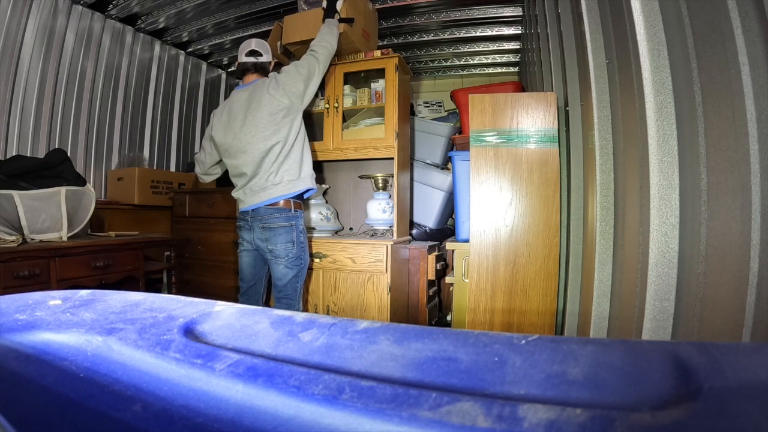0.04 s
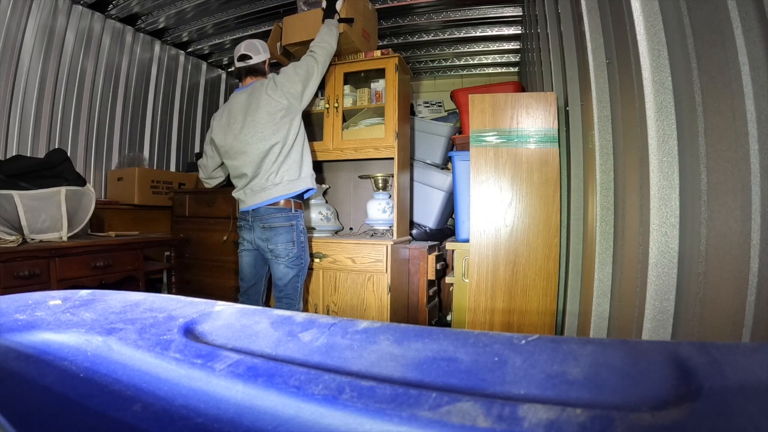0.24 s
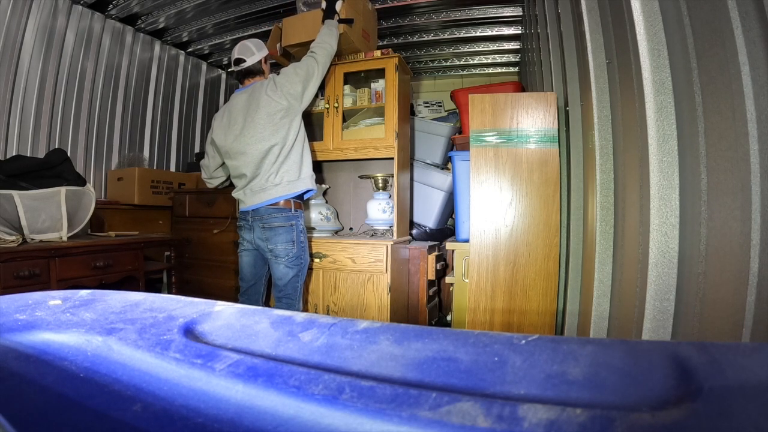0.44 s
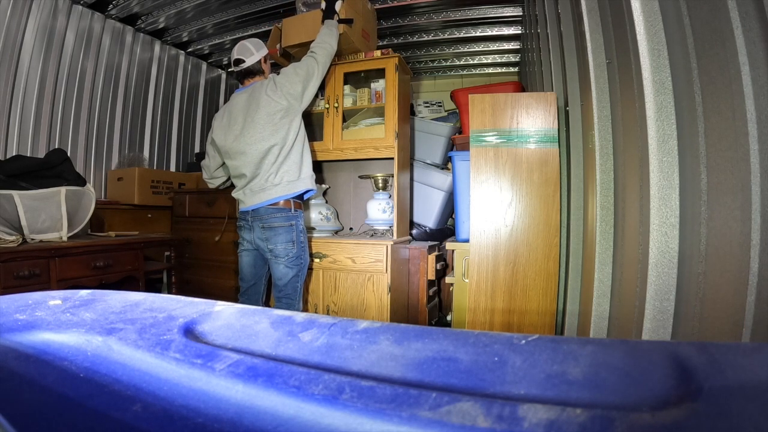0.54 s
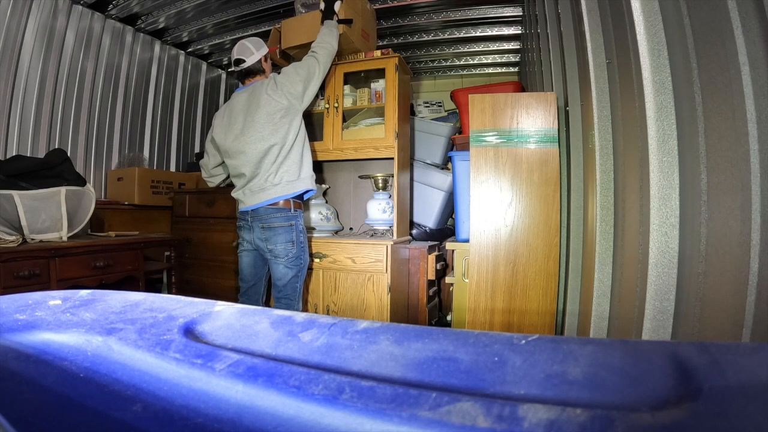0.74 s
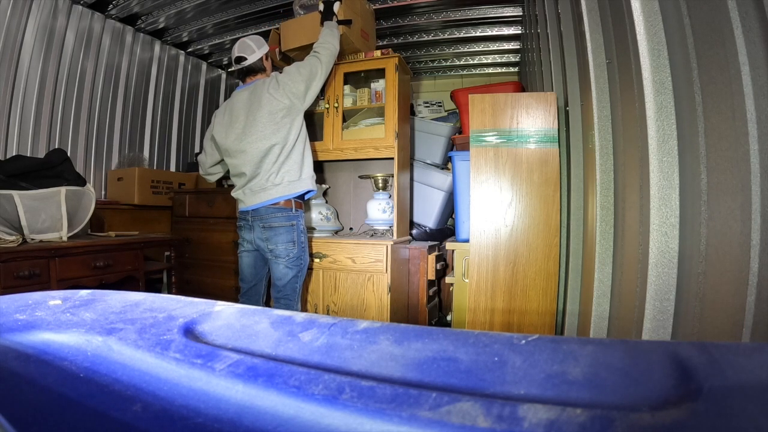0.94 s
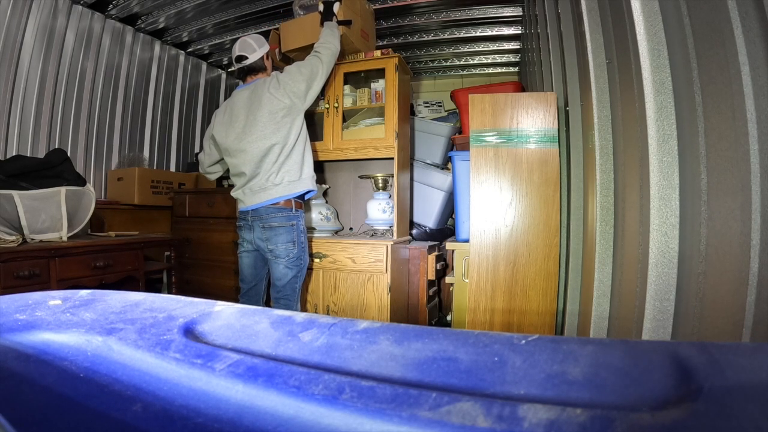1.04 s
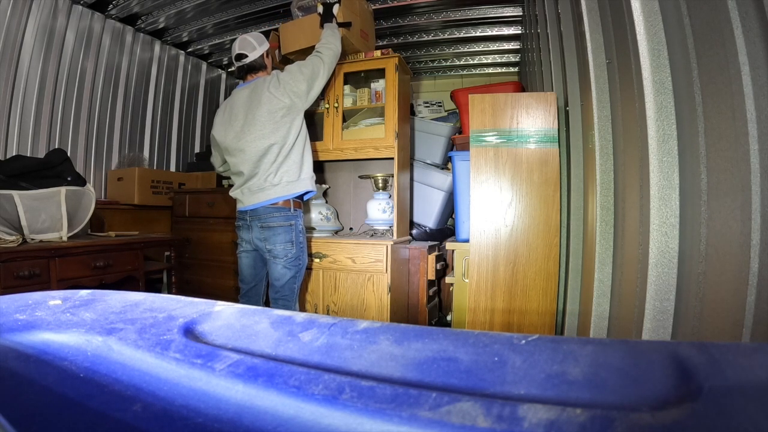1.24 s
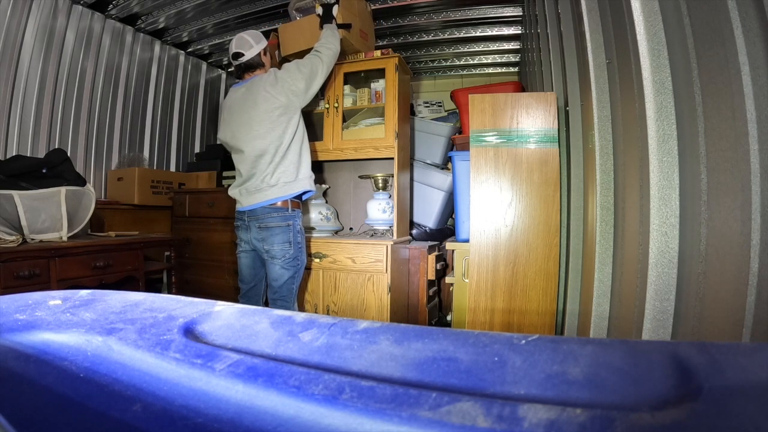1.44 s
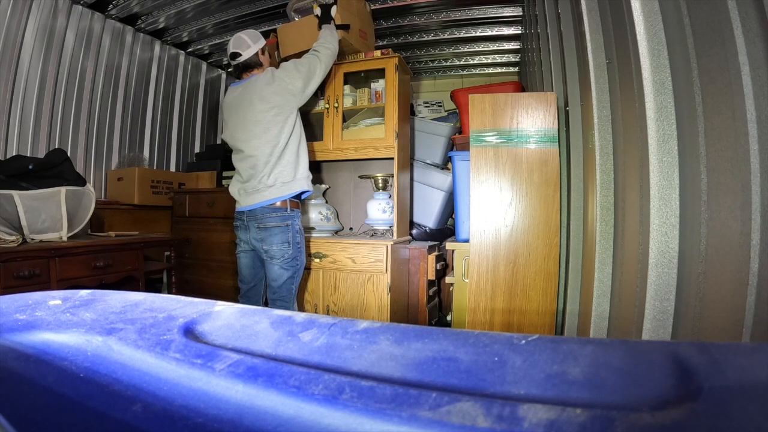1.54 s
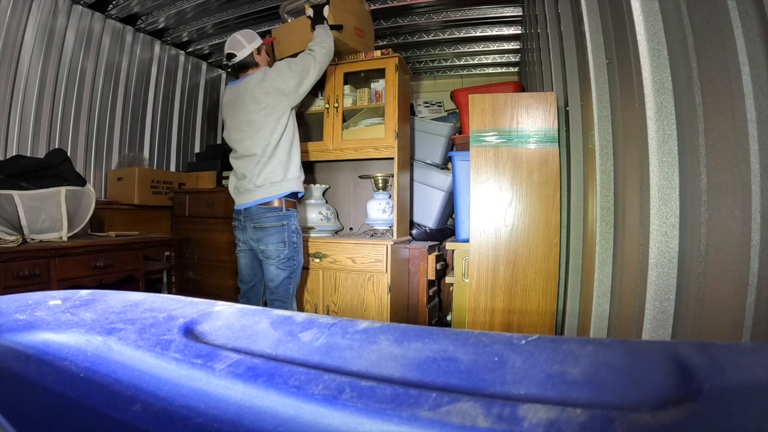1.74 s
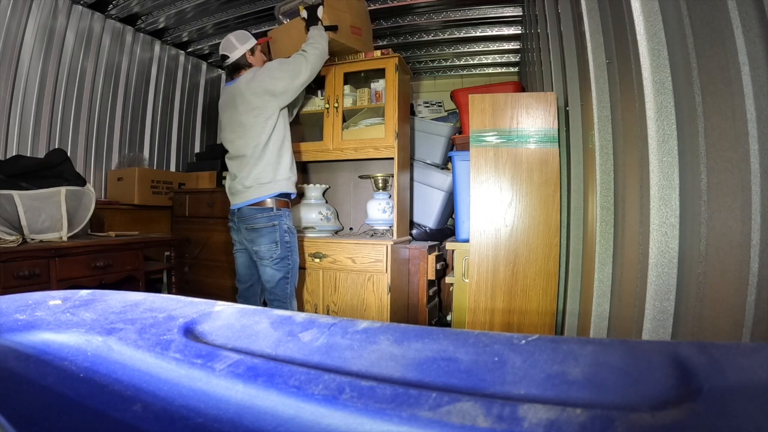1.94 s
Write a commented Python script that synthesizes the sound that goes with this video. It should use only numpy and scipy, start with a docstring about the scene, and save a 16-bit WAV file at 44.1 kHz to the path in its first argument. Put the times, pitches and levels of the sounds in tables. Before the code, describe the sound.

A cardboard box knocks heavily on a wooden cabinet three times in quick succession, booming in a small steel-walled storage unit. It then scuffs and slides faintly over the wood, ending in a short groan and a sleeve rustle.

```python
"""A cardboard box knocks down heavily three times as it is worked off the top of a wooden cabinet.
Each knock makes box and cabinet ring; the small storage unit booms and its sheet-steel walls hum on.
The box also scuffs and slides over the wood, and at the end it groans as it sticks and slips on the edge.
A sleeve rustles as the arms reach up, over faint room noise."""
import sys
import numpy as np
from scipy import signal
from scipy.fft import rfft, irfft, next_fast_len
from scipy.io import wavfile
from scipy.ndimage import map_coordinates

SR = 44100
rng = np.random.default_rng(int(sys.argv[2]) if len(sys.argv) > 2 else 0)


def pcm_store(signal):
    """Save signal as 16-bit PCM."""
    levels = np.round(np.clip(np.atleast_2d(signal), -1, 1) * 32767)
    wavfile.write(sys.argv[1], SR, levels.astype(np.int16).T)


N = 88200  # 2 seconds


def knocks():
    """Each blow tocks, slaps, pops a panel, rings box and cabinet, booms and shakes the walls."""
    # Each row: start in seconds; slap, ring, boom, panel and wall levels in dB; the pitch the blow
    # favours in Hz and its lift in dB; hollow pitch in Hz; tock level in dB; the slap's treble change
    # in dB, its length in seconds and its rise in seconds.
    blows = [(0.232, -17.5, -25, -14, -10, -35, 188, 10, 1340, -20.5, 3.5, 0.064, 0.0045),
             (0.498, -22.5, -28, -16.5, -23.5, -44.5, 402, 15, 367, -13, 1.5, .028, 0.0089),
             (0.738, -20, -17, -16, -17.5, -32.5, 142, 0.5, 960, -21, -1, 0.059, 0.011)]
    # Ringing tones of box and cabinet. Each row: pitch in Hz, relative level in dB, fade in seconds.
    box_tones = [(131, -7.5, 0.26), (153.9, 8.5, 0.23), (179, -5.5, 0.43), (259.7, -3, 0.29),
                 (276.2, 4, 0.22), (417.2, 5.5, 0.23), (492.5, -4.5, 0.15), (532.6, -3, 0.3),
                 (634, 7, 0.14), (767, -12, 0.44), (757, -19.5, 0.15), (958, 3.5, 0.22), (1054, -4, 0.19),
                 (1420, -5, 0.12)]
    # Low tones of the air in the room.
    # Each row: pitch in Hz, relative level in dB, fade in seconds, build-up in seconds.
    air_tones = [(74.5, 13, 0.26, 0.042), (66, -15, 1, 0.09)]
    # Tone colours of the slap and of the steel walls. Each row: frequency in Hz, level in dB.
    slap_colour = [(25, -27), (55, 2), (100, 1), (160, 3), (290, 3), (350, -1), (600, -3.5), (1000, -3.5),
                   (1500, -10.5), (2800, -17.5), (4300, -25.5), (5200, -32), (7000, -34.5), (8500, -46.5),
                   (12800, -53), (15500, -66)]
    wall_colour = [(30, -19), (70, 4.5), (105, -32), (150, 10.5), (210, -8.5), (450, -2.5), (620, -11.5),
                   (900, -6.5), (1400, -20.5), (3000, -30.5), (6000, -42.5), (15000, -55)]
    hollow_lift_db, panel_lift_db = 3, 7.5
    out = np.zeros(N)
    for (start, slap_db, ring_db, boom_db, panel_db, walls_db, favoured_hz, lift_db,
         hollow_hz, tock_db, treble_db, length_s, rise_s) in blows:
        t = since(start)
        hollow_band = lambda hz: near(hz, hollow_hz, octaves=0.35)
        tock = unit(filtered(rng.standard_normal(N), hollow_band))
        out += amp(tock_db) * tock * envelope(t, rise_s=0.003, fade_s=0.06)
        slap = filtered(noise(slap_colour), lambda hz: amp(hollow_lift_db * hollow_band(hz)))
        out += amp(slap_db) * contact(start, slap, treble_db, length_s, rise_s)
        panel = ring(t, hz=264.8, fade_s=0.16, rise_s=0.018)
        out += amp(panel_db + panel_lift_db) * panel
        for hz, db, fade_s in box_tones:
            # Where the blow lands decides which tones ring most.
            favour_db = lift_db * near(hz, favoured_hz, octaves=0.59)
            tone = ring(t, hz, fade_s, rise_s=0.022, drift_radians=0.37 * wobble(60))
            out += amp(ring_db + db + favour_db) * tone
        for hz, db, fade_s, build_s in air_tones:
            out += amp(boom_db + db) * ring(t, hz, fade_s, build_s)
        out += amp(walls_db) * noise(wall_colour) * envelope(t, rise_s=0.01, fade_s=1.27)
    return out


def ring(t, hz, fade_s, rise_s, drift_radians=0):
    """One ringing tone that builds up and dies away; drift makes it waver."""
    return np.sin(2 * np.pi * hz * t + drift_radians) * envelope(t, rise_s, fade_s)


def contact(start, crush, treble_db, length_s, rise_s):
    """Cardboard crushes for a moment; the room's echoes then die, each frequency at its own speed."""
    # The room's echo. Each row: frequency in Hz, seconds to fade by 60 dB.
    room_fade = [(60, .4), (300, 0.32), (1000, 0.3), (2500, 0.36), (7000, 0.28), (13000, 0.15)]
    treble_hz = 1720
    crush = filtered(crush, lambda hz: amp(treble_db * hz ** 2 / (hz ** 2 + treble_hz ** 2)))
    hz, t, bands = signal.stft(crush, SR, nperseg=256)
    after_contact_s = np.maximum(t - start - length_s, 0)
    fade = amp(-60 * after_contact_s / along(room_fade, hz)[:, None])
    return signal.istft(bands * fade, SR)[1][:N] * rise(since(start), rise_s)


def scuffs():
    """The box catches briefly on the cabinet, each time a rasp of its own pitch over a soft thud."""
    # Each row: start in seconds, rasp level in dB, treble change in dB, length in seconds,
    # thud level in dB, rasp pitch in Hz.
    catches = [(0.38, -26.5, -2, 0.022, -32, 2050), (0.982, -53.5, -2.5, 0.016, -40, 1620),
               (1.096, -60.5, 5, 0.01, -46, 2240), (1.211, -62.5, 10, 0.0084, -60.5, 2730),
               (1.324, -49, 3, 0.02, -61, 1010), (1.556, -48.5, 9, 0.011, -44, 3130),
               (1.651, -61, 16.5, 0.019, -56, 2200), (1.963, -48, 6.5, 0.025, -38.5, 3400)]
    # Tone colours of the rasp and of the thud. Each row: frequency in Hz, level in dB.
    rasp_colour = [(100, -30), (250, -24), (420, 1.5), (580, -3), (760, 3), (1180, -2), (1450, 0.5),
                   (2500, -5), (4000, -17), (5200, -29), (7000, -28.5), (9000, -46), (15000, -53)]
    thud_colour = [(30, -44), (70, -4.5), (105, -13), (165, -1), (260, -11.5), (450, -11), (1500, -63)]
    rasp_lift_db = 4
    out = np.zeros(N)
    for start, rasp_db, treble_db, length_s, thud_db, rasp_hz in catches:
        rasp_peak = lambda hz: amp(rasp_lift_db * near(hz, rasp_hz, octaves=0.45))
        rasp = amp(rasp_db) * filtered(noise(rasp_colour), rasp_peak)
        thud = amp(thud_db) * noise(thud_colour)
        out += contact(start, rasp + thud, treble_db, length_s, rise_s=0.003)
    return out


def slide():
    """Cardboard dragged over wood makes a rubbing noise that swells and sinks."""
    # How loud the rubbing is. Each row: time in seconds, level in dB.
    loudness = [(0, -40.5), (.06, -47.5), (.13, -50.5), (.2, -59), (.225, -39), (.3, -76), (.7, -51.5),
                (1.2, -61), (1.47, -66.5), (1.53, -49.5), (1.62, -57.5), (1.72, -55), (1.8, -55.5),
                (1.86, -49.5), (1.95, -60), (2, -50)]
    # Its tone colour. Each row: frequency in Hz, level in dB.
    colour = [(30, -28), (70, -6.5), (105, -11), (160, -0.5), (400, 5), (530, 0.5), (750, 1.5),
              (1100, -0.5), (1500, 0), (2400, -9.5), (4000, -14), (5200, -39), (7000, -36), (9000, -49),
              (15000, -71)]
    level_db, = curves(loudness)
    return amp(level_db) * noise(colour)


def groan():
    """The box sticks and slips on the edge, slower and harder as it tips."""
    # The course of the groan. Each row: time in seconds, slips per second, level in dB.
    slips = [(1.8, 262, -64), (1.83, 256, -54), (1.876, 245, -51), (1.895, 215, -43), (1.93, 200, -42),
             (1.96, 182, -43), (1.973, 168, -34), (2, 152, -38)]
    # The tones in it. Each row: multiple of the slip rate, relative level in dB.
    overtones = [(1, -11), (2, -20), (3, -51), (4, -26)]
    # Tone colour of its gritty noise. Each row: frequency in Hz, level in dB.
    grit_colour = [(100, -24), (250, 7), (420, -7), (800, -4), (1500, -17), (5000, -46)]
    pitch_jitter, flutter_db, grit_db = 0.05, 1.5, -9
    slip_hz, level_db = curves(slips)
    uneven_hz = slip_hz * (1 + pitch_jitter * wobble(120))
    phase = 2 * np.pi * np.cumsum(uneven_hz) / SR
    tone = unit(sum(amp(db) * np.sin(round(multiple) * phase) for multiple, db in overtones))
    grit = unit(noise(grit_colour) * (1 + np.cos(phase)))  # one puff of noise per slip
    gain = amp(level_db + flutter_db * wobble(98))
    onset = rise(since(slips[0][0]), rise_s=0.013)
    return (tone + amp(grit_db) * grit) * gain * onset


def sleeve():
    """Cloth rustles as the arms reach up."""
    # How loud the rustle is. Each row: time in seconds, level in dB.
    loudness = [(0, -96), (.09, -97), (.11, -63), (.2, -82), (.95, -69), (1.005, -56), (1.07, -68.5),
                (1.11, -60), (1.27, -73.5), (1.41, -72), (1.425, -59.5), (1.54, -61.5), (1.72, -55.5),
                (1.94, -52), (2, -42)]
    # Its tone colour. Each row: frequency in Hz, level in dB.
    colour = [(300, 21.5), (2000, 18), (4200, 15), (5400, 5.5), (7000, 10.5), (8500, 1), (11000, -1),
              (12800, -1.5), (14000, -2), (15700, -14)]
    level_db, = curves(loudness)
    rustle = noise(colour) * amp(wobble(300))  # the level flickers by about 1 dB
    return amp(level_db) * unit(rustle)


def room_noise():
    """The faint, steady, low noise of the room."""
    # Its tone colour. Each row: frequency in Hz, level in dB.
    colour = [(25, 7), (70, -29), (110, -6), (250, 16.5), (1000, -51), (4000, -20), (5400, -29),
              (7000, -20), (9000, -37), (12800, -28.5), (15500, -49)]
    return amp(-60) * noise(colour)


def noise(colour):
    """Noise of a given tone colour and strength 1, rippled by the room's many close ringing tones."""
    ripple_db, spacing_hz, ripple_from_hz = 2.8, 22, 500

    def gain(hz):
        bumps = map_coordinates(rng.standard_normal(2048), [hz / spacing_hz], mode="wrap")
        ripple = bumps * hz / (hz + ripple_from_hz)  # weaker in the bass
        return amp(along(colour, hz) + ripple_db * ripple)

    return unit(filtered(rng.standard_normal(N), gain))


def filtered(x, gain):
    """Turns each frequency of x up or down by gain(hz)."""
    size = next_fast_len(N + SR // 2)
    hz = np.fft.rfftfreq(size, 1 / SR)
    return irfft(rfft(x, size) * gain(hz), size)[:N]


def near(hz, centre_hz, octaves):
    """A bell shape: 1 at the centre pitch, falling towards 0 on both sides."""
    return np.exp(-(np.log2((hz + 1) / centre_hz) / octaves) ** 2)


def along(points, hz):
    """Joins (frequency, value) points with lines that are straight on a scale of octaves."""
    point_hz, values = np.transpose(points)
    return np.interp(np.log(hz + 1), np.log(point_hz + 1), values)


def curves(rows):
    """Joins timed rows into one curve for each column after the time."""
    times, *columns = np.transpose(rows)
    return [np.interp(np.arange(N) / SR, times, column) for column in columns]


def envelope(t, rise_s, fade_s):
    """A soft start, and a fall of 60 dB every fade_s seconds."""
    return rise(t, rise_s) * np.exp(-np.log(1000) * t / fade_s)


def rise(t, rise_s):
    """A soft start from 0 to 1."""
    return 1 - np.exp(-(t / rise_s) ** 2)


def since(start):
    """Seconds since a moment, zero before it."""
    return np.maximum(np.arange(N) / SR - start, 0)


def wobble(per_second):
    """A smooth curve through this many random values a second."""
    return map_coordinates(rng.standard_normal(4096), [np.arange(N) * per_second / SR], mode="wrap")


def amp(db):
    """Turns decibels into a number to multiply by."""
    return 10 ** (np.asarray(db) / 20)


def unit(x):
    """Scales a sound to an average strength (rms) of 1."""
    return x / np.sqrt(np.mean(x ** 2) + 1e-20)


def scene():
    """Box, sleeve and room noise added into one channel."""
    return (knocks() + scuffs() + slide() + groan() + sleeve() + room_noise())[None]


def record(dry):
    """Cuts off the very highest treble."""
    top_hz = 15750
    return np.array([filtered(x, lambda hz: hz < top_hz) for x in dry])


dry = scene()
out = record(dry)
pcm_store(out)
```